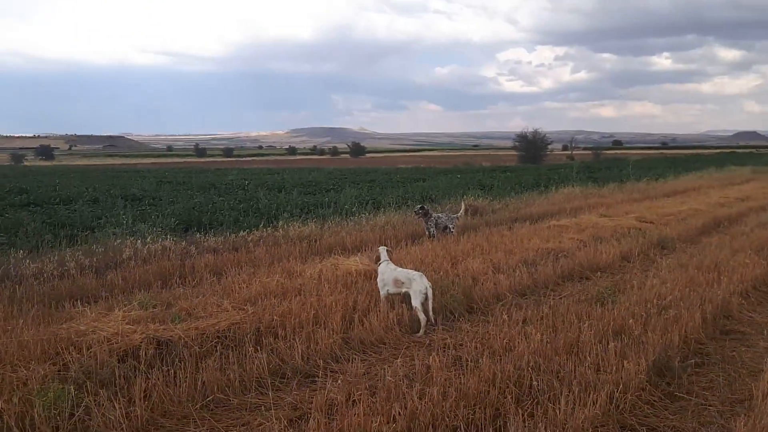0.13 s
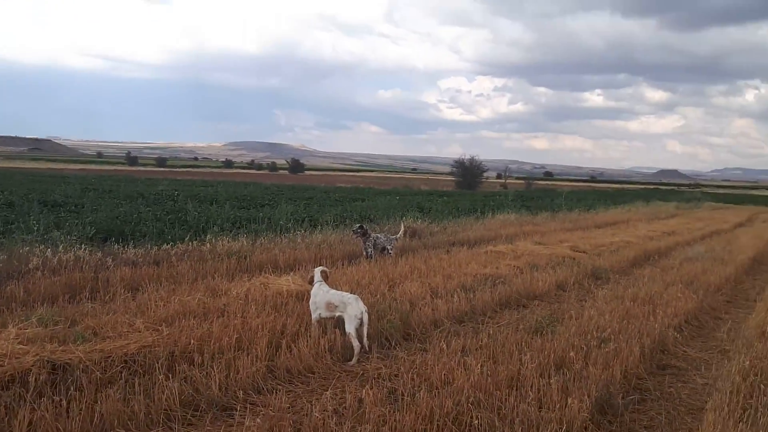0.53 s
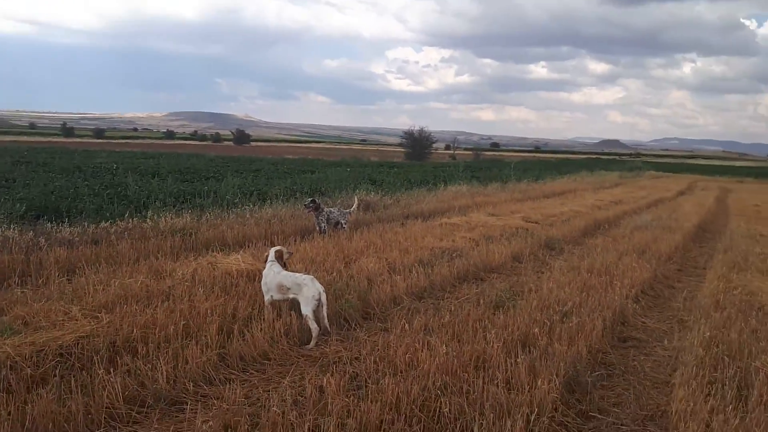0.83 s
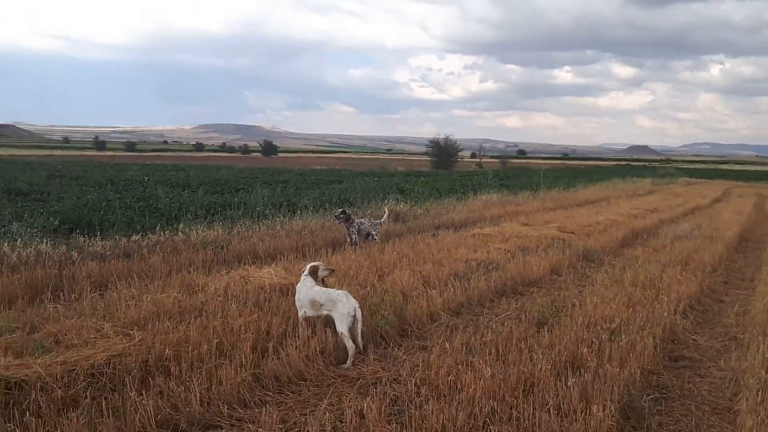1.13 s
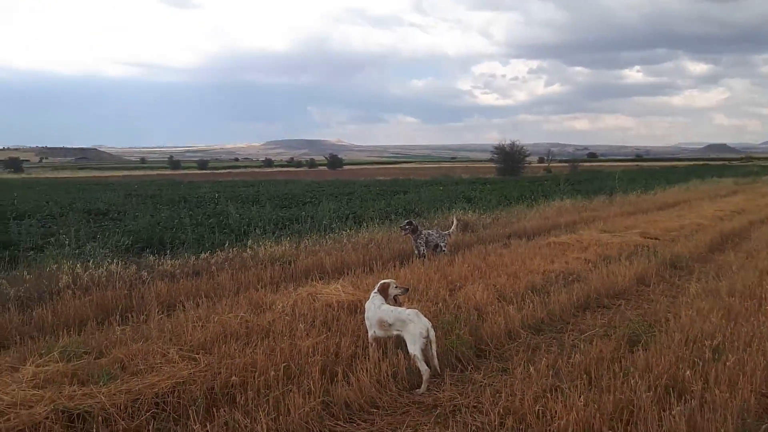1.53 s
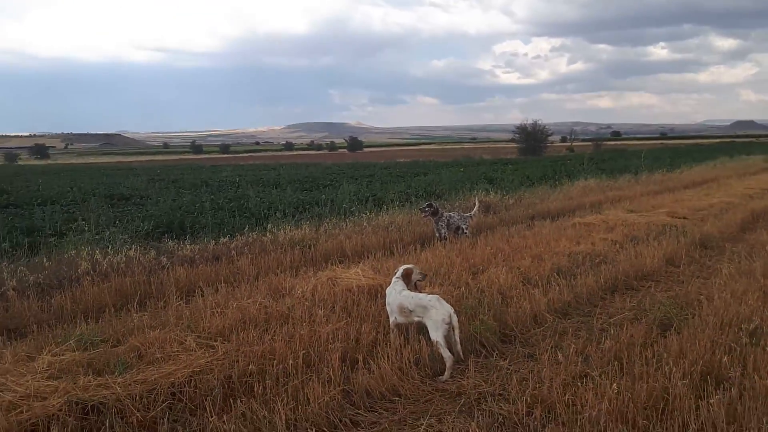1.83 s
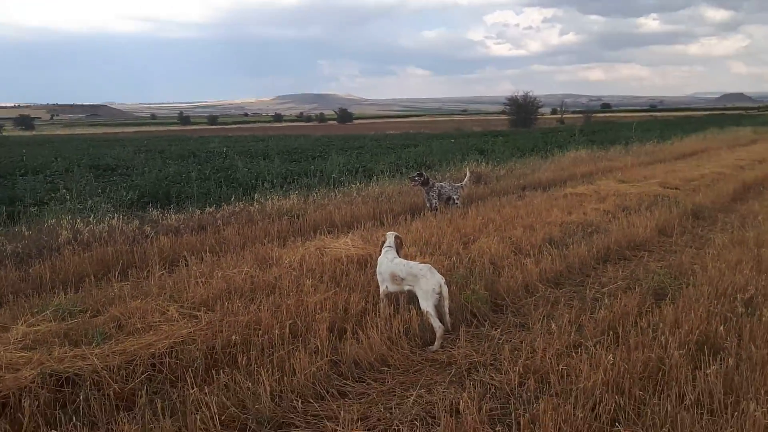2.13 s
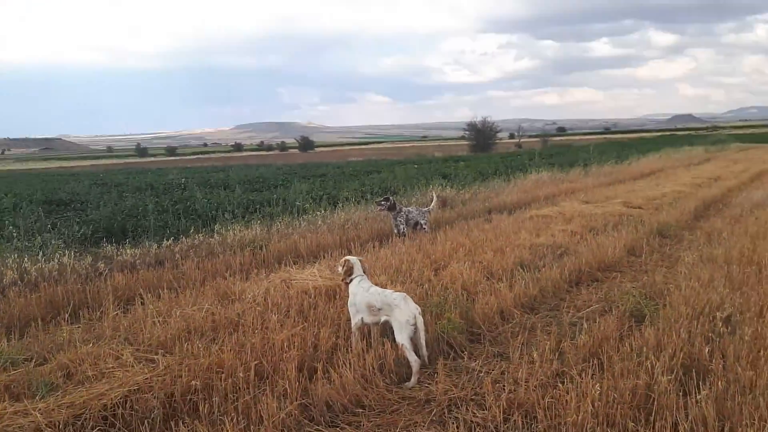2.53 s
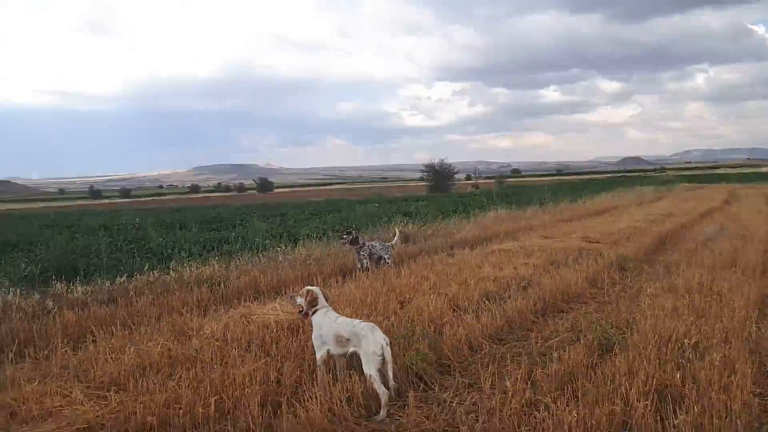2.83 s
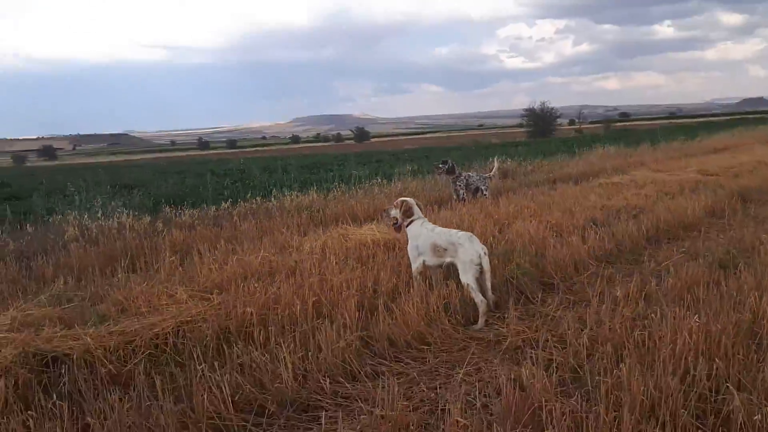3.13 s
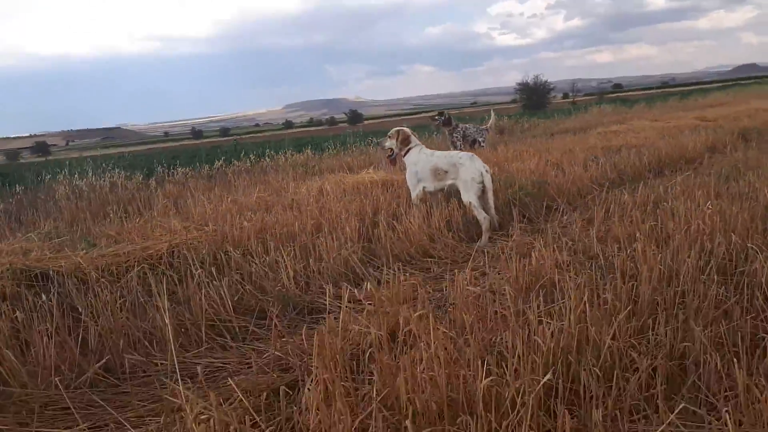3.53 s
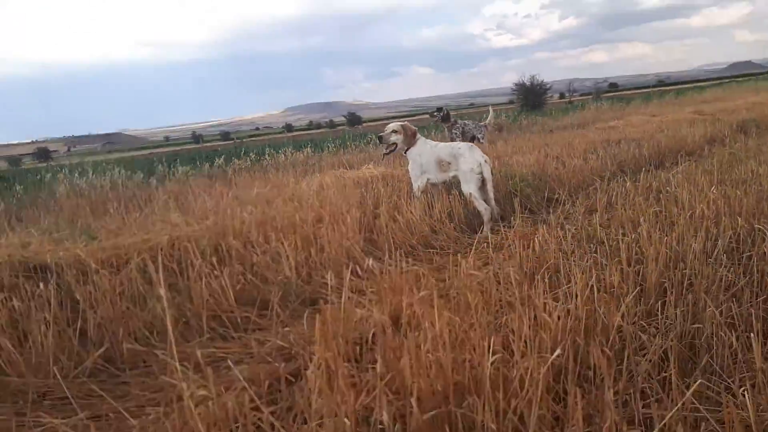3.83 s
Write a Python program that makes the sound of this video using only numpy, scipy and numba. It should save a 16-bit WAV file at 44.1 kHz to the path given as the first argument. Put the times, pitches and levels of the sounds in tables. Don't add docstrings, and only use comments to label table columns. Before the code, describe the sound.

Crunching footsteps push through dry stubble, stalks swishing and snapping sharply close by, strongest in the first half, then slower and sparser, with low wind bumps on a handheld microphone in an open field without echo.

```python
import sys
import numpy as np
from scipy import signal
from scipy.fft import rfft, irfft
from scipy.io import wavfile
from scipy.ndimage import uniform_filter1d
from numba import njit

SR = 44100
rng = np.random.default_rng(int(sys.argv[2]) if len(sys.argv) > 2 else 0)


def store_pcm(level_fs):
    pcm = np.round(np.clip(level_fs, -1, 1) * 32767).astype(np.int16)
    wavfile.write(sys.argv[1], SR, np.atleast_2d(pcm).T)


def ratio_of_db(decibels):
    return 10 ** (np.asarray(decibels, float) / 20)


N = 176400
PORT_LAG_S, LAG_SPREAD_S = 7e-5, 6e-5

# (time [s], brushing level [dB], left minus right [dB])
STRIDE = [(0, -43.5, -3.5), (.8, -42, -4.5), (1.1, -42.5, -3.5), (1.5, -43, -3.5), (1.9, -46.5, -4.5),
          (2.45, -52.5, -5.5), (2.62, -46, -5), (2.8, -46.5, 0.5), (3.25, -50.5, -1), (3.35, -57, 1),
          (3.55, -47.5, -1), (3.75, -46.5, 0), (3.9, -57.5, -1), (4, -57, -3)]
# (start [s], length [s], level [dB])
SWISHES = [(0.097, 0.11, -37.5), (0.244, 0.097, -34), (0.384, 0.061, -37.5), (0.529, 0.044, -33),
           (0.606, 0.029, -34), (0.677, 0.022, -37.5), (1.12, 0.036, -37), (1.185, 0.11, -34),
           (1.329, 0.066, -36.5), (1.397, 0.073, -35.5), (1.57, 0.055, -47.5), (1.745, 0.076, -41.5),
           (2.137, 0.061, -40), (2.28, 0.11, -47.5), (2.664, 0.086, -45.5), (2.848, 0.059, -45),
           (3.057, 0.02, -43.5), (3.194, 0.031, -49.5), (3.632, 0.062, -48.5), (3.81, 0.08, -51)]
# (frequency [Hz], density [dB per Hz])
STRAW_SPECTRUM = [(180, -17), (300, -12), (480, -5.5), (2980, -4), (6560, -2), (9650, -20.5), (12600, -8),
                  (14900, -12), (16500, -4.5)]
# (start [s], length [s], left level [dB], right level [dB])
PUFFS = [(0, 0.031, -46, -45), (0.09, 0.22, -51.5, -51.5), (0.346, 0.29, -61, -45),
         (0.544, 0.06, -55, -38.5), (0.653, 0.044, -53, -37.5), (0.75, 0.19, -51.5, -42),
         (0.982, 0.033, -47, -40), (1.043, 0.16, -48.5, -48), (1.25, 0.063, -42.5, -45),
         (1.327, 0.072, -37, -35), (1.455, 0.049, -42.5, -40), (1.558, 0.19, -42.5, -36.5),
         (1.797, 0.053, -44.5, -41.5), (1.902, 0.12, -44, -38.5), (2.05, 0.044, -39.5, -35.5),
         (2.177, 0.058, -46.5, -45), (2.278, 0.12, -50, -69), (2.464, 0.051, -58, -64),
         (2.6, 0.098, -45, -64), (2.725, 0.11, -40.5, -47.5), (2.909, 0.074, -36, -46),
         (3.042, 0.076, -43.5, -49.5), (3.17, 0.24, -63, -59), (3.485, 0.037, -59.5, -48.5),
         (3.554, 0.057, -56, -56)]
# (frequency [Hz], density [dB per Hz])
WIND_SPECTRUM = [(12, -54), (20, -15.5), (71, 4.5), (93, 7), (338, -5.5), (386, -9), (700, -33), (910, -73),
                 (1540, -120)]
# (frequency [Hz], density [dB per Hz])
HUSH_SPECTRUM = [(130, -28.5), (450, 4.5), (620, -20), (1400, 2), (2350, -30), (6500, 2.5), (9600, -30),
                 (15000, -12)]
# (time [s], peak level [dB], pitch [Hz])
KNOCKS = [(0.528, -20, 1120), (0.587, -23.5, 470), (0.6, -25, 540), (0.619, -25, 420), (0.631, -25, 433),
          (0.716, -26, 860), (0.747, -22, 1260), (1.342, -20, 960), (1.365, -17, 1240), (1.399, -24, 445),
          (1.454, -19, 494), (1.573, -16, 620), (1.688, -25, 464), (2.184, -30, 466), (2.259, -22.5, 750),
          (2.329, -16.5, 950), (2.584, -24, 550), (3.215, -27, 1050), (3.522, -32.5, 520),
          (3.557, -28, 596), (3.569, -30, 790), (3.811, -33, 630)]
# (time [s], peak level [dB], pitch [Hz])
MORE_KNOCKS = [(.004, -30, 1490), (.587, -18, 1300), (.599, -30, 1500), (.606, -27, 600), (.6205, -41, 900),
               (.652, -41, 600), (.768, -33, 705), (1.184, -16.5, 2040), (1.264, -29, 2640), (1.276, -32, 1930),
               (1.33, -24, 1970), (1.3782, -19, 1800), (1.3925, -27, 600), (1.4, -13.5, 1820),
               (1.365, -17.5, 1970), (1.343, -20.5, 1600), (1.409, -26, 445), (1.43, -39, 2200),
               (1.677, -23, 1490), (2.399, -31.5, 960), (2.471, -34.5, 554), (2.549, -37, 1000),
               (2.585, -20, 1110), (2.585, -17.5, 2030), (2.826, -40, 660), (2.957, -28.5, 845),
               (3.184, -33, 1000), (3.221, -26, 784), (3.305, -38, 900), (3.39, -51, 1360), (3.463, -44, 590),
               (3.523, -27.5, 1290), (3.588, -34, 700), (3.811, -32.5, 980)]
# (time [s], peak level [dB], pitch [Hz])
THUMPS = [
    (2.048, -20, 127),
    (2.060, -22, 232),
]
# (time [s], peak level [dB], pitch [Hz])
SNAPS = [(0.3972, -18.5, 7000), (0.4483, -20, 6400), (0.5275, -16.5, 6900), (0.5684, -16.5, 3800),
         (0.612, -14, 7100), (0.632, -13, 6540), (0.6502, -10, 7550), (0.6851, -15, 7400),
         (0.7501, -17.5, 6960), (0.7885, -21, 7100), (1.2768, -7, 4340), (1.3532, -15.5, 6500),
         (1.3755, -21, 3800), (1.4161, -15, 11500), (1.497, -18.5, 4040), (1.5458, -23, 6400),
         (1.5969, -14.5, 6000), (1.677, -22.5, 3700), (1.9845, -23, 7000), (2.0602, -18, 2100),
         (2.2021, -23.5, 6640), (2.326, -19.5, 6700), (2.5849, -21.5, 6600), (2.633, -25, 5760),
         (2.7256, -24.5, 5660), (3.4626, -28.5, 7000), (3.6513, -21, 3070), (3.7319, -21.5, 5530),
         (3.802, -24, 7600), (3.8103, -19, 2170)]
# (time [s], peak level [dB], pitch [Hz])
MORE_SNAPS = [(.6357, -23, 9000), (0.38, -22, 2000), (2.3344, -25, 8100), (3.6988, -26, 9800),
              (3.3008, -35, 4200), (3.4038, -35, 9900), (3.6003, -28, 4200), (.6706, -17, 11000),
              (0.5, -26, 5100), (0.63, -23, 7700), (.7182, -27, 3250), (0.73, -32, 3700), (1, -18, 3400),
              (1.1, -16.5, 4100), (1.1, -24, 8400), (1.3, -20, 5800), (2, -21, 3100), (1.6, -21, 11000),
              (3.5878, -29, 4300), (0.12, -32, 4400), (.1262, -30, 3300), (2.9, -29, 6900), (3, -27, 2400)]
# (start [s], length [s], level [dB], pitch [Hz])
SCRAPES = [(1.185, .125, -42, 4260), (1.205, .07, -43, 6550), (.245, .085, -47, 6150),
           (1.445, .028, -45, 4180), (3.645, .1, -51, 6150), (2.852, .04, -55, 6050)]
# (start [s], length [s], level [dB])
CRUSHES = [(0.536, 0.061, -47.5), (0.577, 0.069, -37), (0.666, 0.029, -51.5), (1.36, 0.046, -37.5),
           (1.588, 0.11, -49), (2.125, 0.096, -48.5), (2.641, 0.51, -53)]
# (centre [Hz], width [Hz], share removed [0-1])
SHADE = [(2240, 580, 0.46), (4170, 800, 0.26)]


@njit
def ring(out, at, lag, hz, cycles, left, right):
    for k in range(len(at)):
        turn = np.exp((2j * np.pi - 1 / cycles[k]) * hz[k] / SR)
        whole = int(np.floor(lag[k]))
        a = left[k] + 0j
        b = right[k] * turn ** (1 - lag[k] + whole)
        for i in range(at[k], min(at[k] + int(6 * cycles[k] * SR / hz[k]) + 2, out.shape[1] - 64)):
            out[0, i] += a.imag
            out[1, i + whole + 1] += b.imag
            a, b = a * turn, b * turn
    return out


def grains(t, hz, cycles, size, pan_db, lag_s):
    pad = 64
    lag = np.clip(lag_s * SR, -30, 30)
    at = (t * SR).astype(np.int64) + pad
    left, right = size * ratio_of_db(pan_db / 2), size * ratio_of_db(-pan_db / 2)
    return ring(np.zeros((2, N + 3 * pad)), at, lag, hz, cycles, left, right)[:, pad:pad + N]


def unit(x):
    return x / np.sqrt(np.mean(x ** 2))


def curve(table, col, t):
    return np.interp(t, np.array(table)[:, 0], np.array(table)[:, col])


def side_db(t):
    return np.array([[.5], [-.5]]) * curve(STRIDE, 2, t)


def band_pass(x, order, low_hz, high_hz):
    return signal.sosfilt(signal.butter(order, [low_hz, high_hz], "band", fs=SR, output="sos"), x)


def colour(x, points):
    hz, db = np.array(points).T
    size = 8192
    bins_hz = np.arange(size // 2 + 1) * SR / size
    cepstrum = irfft(np.log(ratio_of_db(np.interp(np.log(bins_hz + 1), np.log(hz), db))))
    cepstrum[1:size // 2] *= 2
    cepstrum[size // 2:] = 0
    response = irfft(np.exp(rfft(cepstrum)))[None, :size // 2]
    return signal.fftconvolve(x, response, axes=1)[:, :x.shape[1]]


def walk(rate_hz):
    k = int(SR / rate_hz)
    held = np.repeat(rng.standard_normal(3 * N // k + 9), k)
    return unit(uniform_filter1d(uniform_filter1d(held, k), k)[:N])


def plateaus(start, length, db, rise_s, fall_s):
    t = np.arange(0, N + 64, 64)[None] / SR
    start, length, db = (np.array(c)[:, None] for c in (start, length, db))
    rise = np.minimum((t - start) / rise_s, 0)
    fall = np.maximum((t - start - length) / fall_s, 0)
    power = np.sum((ratio_of_db(db) * np.exp(rise - fall)) ** 2, axis=0)
    return np.interp(np.arange(N) / SR, t[0], np.sqrt(power))


def rustle():
    count = 60000
    u, g = rng.random((count, 3)).T, rng.standard_normal((count, 2)).T
    when = u[0] * N / SR
    hz = 600 * 29 ** u[1]
    at = (u[0] * N).astype(int)
    patch = np.array([walk(14) for _ in range(6)])[(u[1] * 6).astype(int), at]
    db = -2.5 * np.log(u[2] + 0.012) + 1.18 * walk(44.96)[at] + 0.6 * patch
    size = hz * ratio_of_db(np.minimum(db, 11))
    x = grains(when, hz, 0.93 + 0 * when, size, 1.5 * g[0], PORT_LAG_S + LAG_SPREAD_S * g[1])
    x = unit(colour(x, STRAW_SPECTRUM))
    t = np.arange(N) / SR
    sweeps = plateaus(*zip(*SWISHES), rise_s=0.03, fall_s=0.029)
    push = np.hypot(ratio_of_db(curve(STRIDE, 1, t)), sweeps)
    low = signal.sosfiltfilt(signal.butter(1, 2800, fs=SR, output="sos"), x)
    x = x - low + low * (push / np.median(push)) ** (.55 - 1)
    return x * push * ratio_of_db(1 + side_db(t))


def wind():
    bumps = ratio_of_db(np.array([2 * walk(10.94) + 1.5 * walk(40.215) for _ in range(2)]))
    start, length, *ports_db = zip(*PUFFS)
    puffs = np.array([plateaus(start, length, db, rise_s=0.016, fall_s=0.029) for db in ports_db])
    gain = (puffs + ratio_of_db(-71.5)) * unit(bumps)
    air = colour(rng.standard_normal((2, N)), list(WIND_SPECTRUM) + [(1500, -105)])
    air = air / np.sqrt(uniform_filter1d(air ** 2, size=2600, axis=1))
    low = signal.sosfilt(signal.butter(2, 170, fs=SR, output="sos"), air)
    return gain * (low + (air - low) * (gain / gain.mean()) ** 0.058)


def hush():
    noise = rng.standard_normal((3, N))
    shared = signal.sosfilt(signal.butter(1, 1500, fs=SR, output="sos"), noise[0] - noise[1:])
    return ratio_of_db(-54.5 + 1.0 * walk(2.4)) * unit(colour(noise[1:] + shared, HUSH_SPECTRUM))


def knocks():
    at, db, hz = np.array(list(KNOCKS) + list(MORE_KNOCKS) + list(THUMPS)).T
    same = 0 * at
    x = grains(at + 0.00121, 1. * hz, 0.94 + same, ratio_of_db(db - 1), -1.5 + same, PORT_LAG_S + same)
    return band_pass(x, 2, 110, 3600)


def snaps():
    late_s, right_lag_s, width = .0012, 3e-5, 0.45
    out, t = np.zeros((2, N + 2048)), np.arange(1024) / SR
    decay = np.exp(-t / 0.00048) + ratio_of_db(-21) * np.exp(-t / 0.0035)
    shape = (1 - np.exp(-t / 0.0005)) * decay
    for at, db, hz in list(SNAPS) + list(MORE_SNAPS):
        noise = rng.standard_normal((3, len(t)))
        burst = shape * (noise[0] + .5 * noise[1:])
        broad = ratio_of_db(0.7) * signal.lfilter([1, -.85], 1, burst)
        pitched = ratio_of_db(5) * band_pass(burst, 1, hz * (1 - width / 2), hz * (1 + width / 2))
        burst = colour(broad + pitched, STRAW_SPECTRUM)
        burst = burst / np.abs(burst).max() * ratio_of_db(db + 2.5 + side_db(at))
        for ch in range(2):
            i = int((at + late_s + ch * right_lag_s) * SR)
            out[ch, i:i + len(t)] += burst[ch]
    return out[:, :N]


def scrapes():
    out, width = 0, .2
    for start, length, db, hz in SCRAPES:
        noise = rng.standard_normal((3, N)) * ratio_of_db(2.2 * walk(220))
        x = band_pass(0.56 * noise[0] + noise[1:], 2, hz * (1 - width / 2), hz * (1 + width / 2))
        out = out + unit(x) * plateaus([start], [length], [db], rise_s=.02, fall_s=.02)
    return out * ratio_of_db(side_db(np.arange(N) / SR))


def crush():
    count = 6000
    u, g = rng.random((count, 3)).T, rng.standard_normal((count, 2)).T
    size = np.sign(g[0]) * ratio_of_db(-6.5 * np.log(u[2] + 0.014) + 2.0 * u[1])
    hz = 341 * 2 ** (2.58 * u[1] ** 1.28)
    lag_s = PORT_LAG_S + 0.2 * LAG_SPREAD_S * g[1]
    x = grains(u[0] * N / SR, hz, 1.24 + 0 * size, size, -1.5 + 0 * size, lag_s)
    x = signal.sosfilt(signal.butter(2, 280, "high", fs=SR, output="sos"), x)
    return unit(x) * plateaus(*zip(*CRUSHES), rise_s=0.016, fall_s=0.022)


def shade(x):
    turn_s = 2.65
    turned = np.clip((np.arange(N) / SR - turn_s) * 10, 0, 1)
    for hz, width, share in SHADE:
        x = x - min(share, 1) * turned * band_pass(x, 1, hz - width / 2, hz + width / 2)
    return x


def scene():
    return shade(rustle()) + wind() + hush() + knocks() + snaps() + scrapes() + crush()


def top_cut(x):
    return signal.sosfilt(signal.butter(12, 16990, fs=SR, output="sos"), x)


def record(dry):
    mix = signal.sosfilt(signal.ellip(10, .5, 70, 15850, fs=SR, output="sos"), dry)
    return top_cut(mix)


dry = scene()
out = record(dry)
store_pcm(out)
```